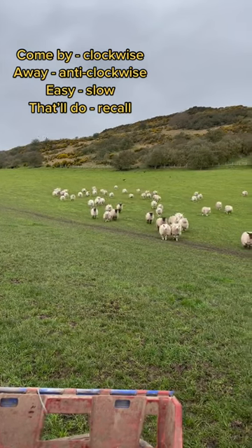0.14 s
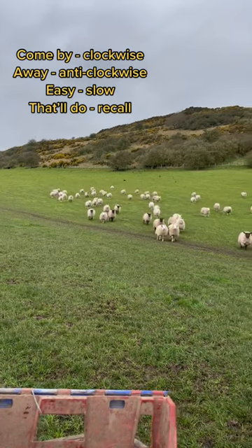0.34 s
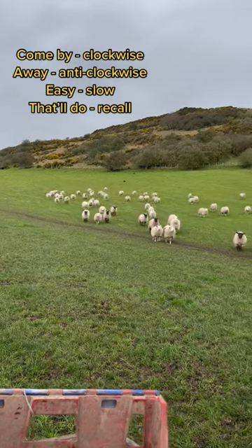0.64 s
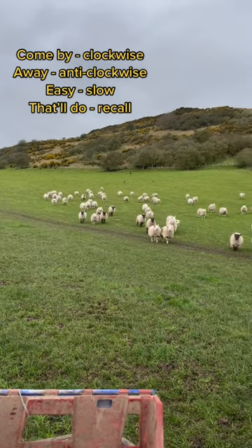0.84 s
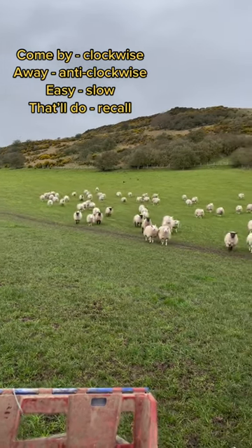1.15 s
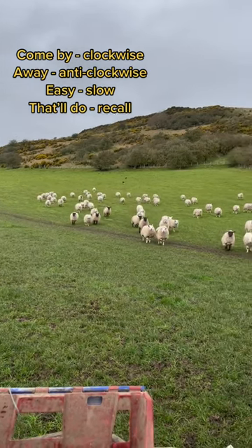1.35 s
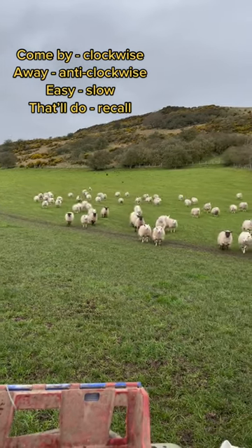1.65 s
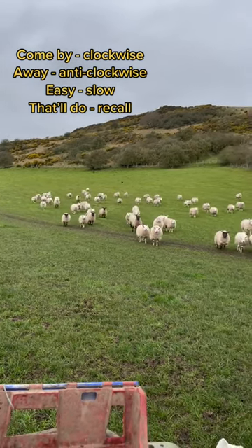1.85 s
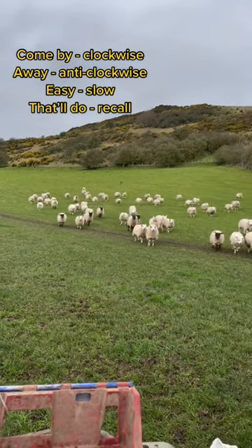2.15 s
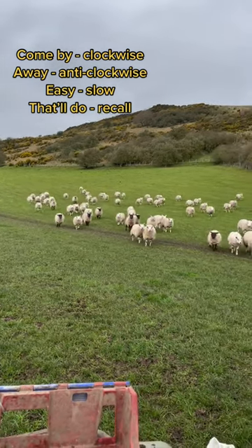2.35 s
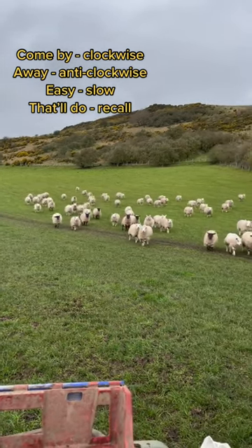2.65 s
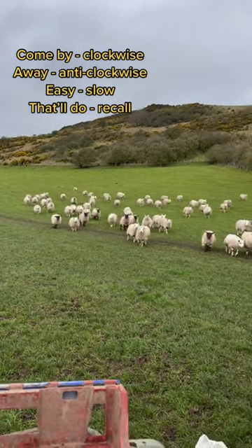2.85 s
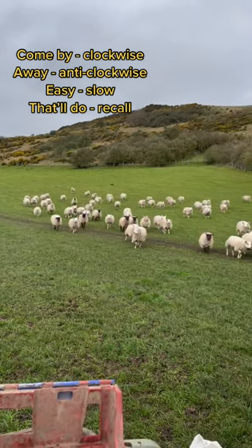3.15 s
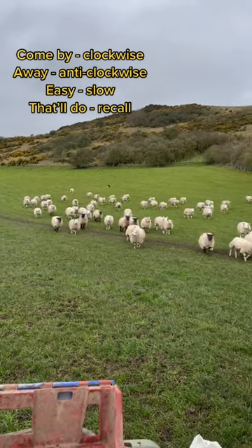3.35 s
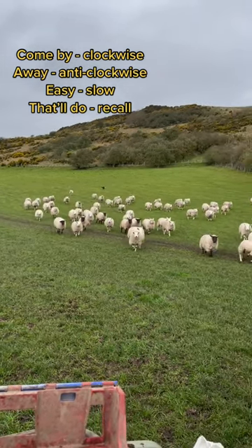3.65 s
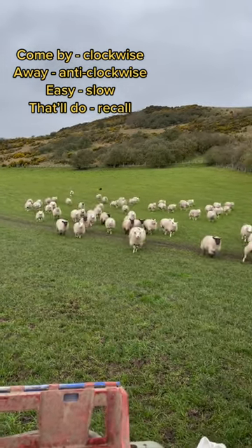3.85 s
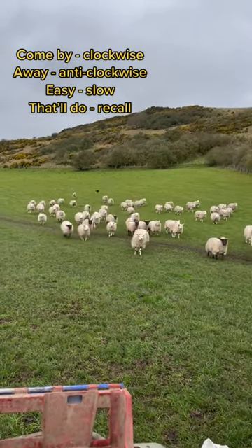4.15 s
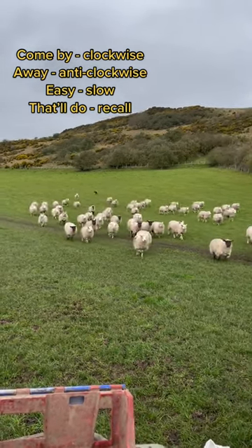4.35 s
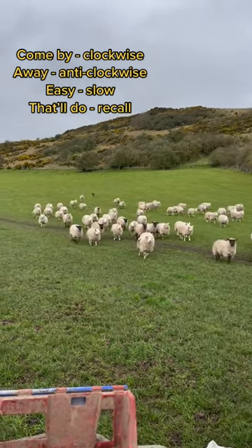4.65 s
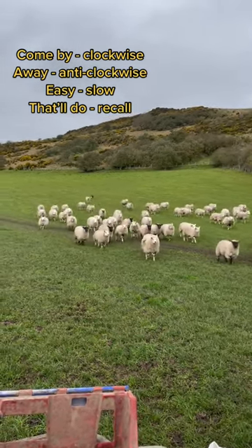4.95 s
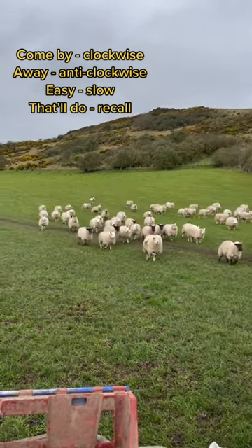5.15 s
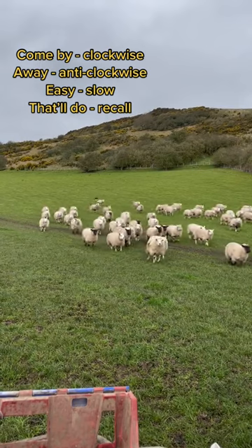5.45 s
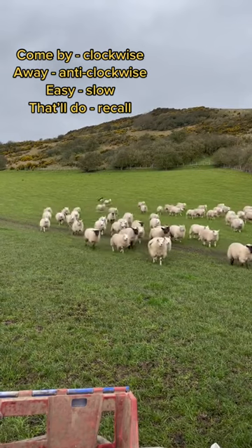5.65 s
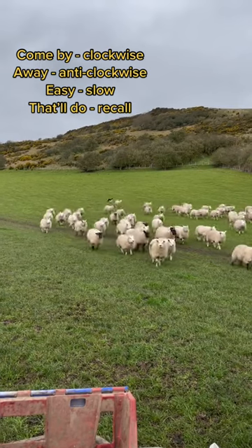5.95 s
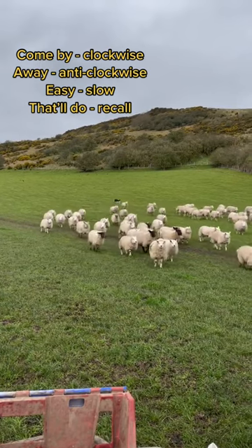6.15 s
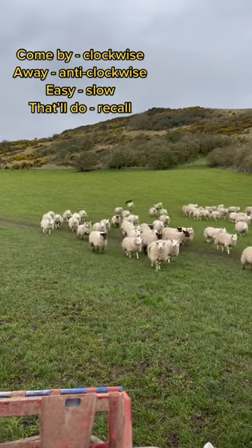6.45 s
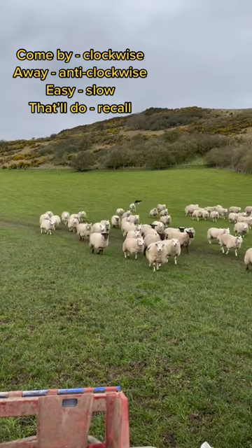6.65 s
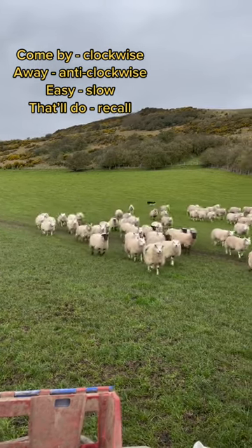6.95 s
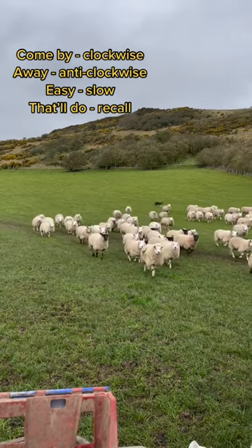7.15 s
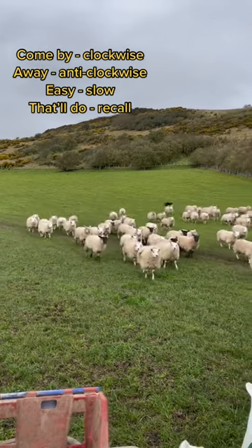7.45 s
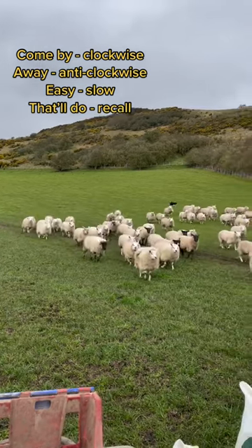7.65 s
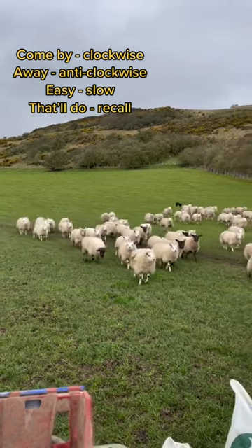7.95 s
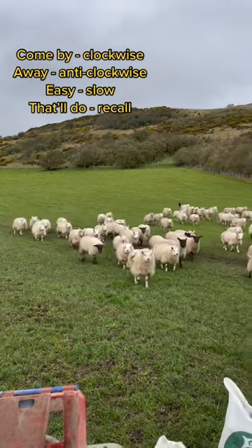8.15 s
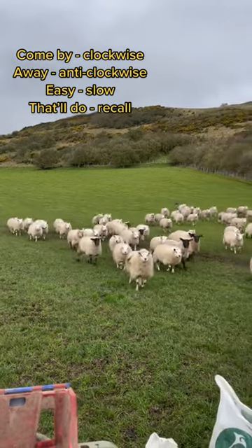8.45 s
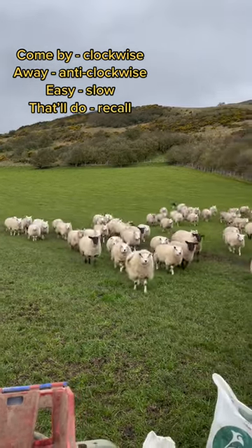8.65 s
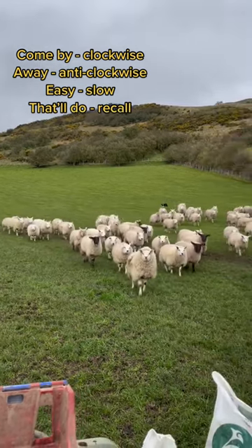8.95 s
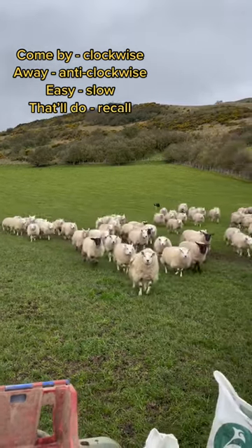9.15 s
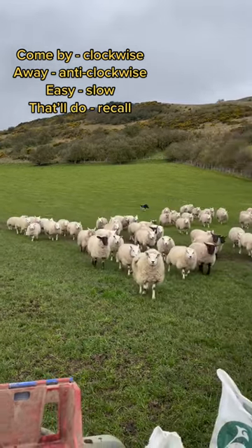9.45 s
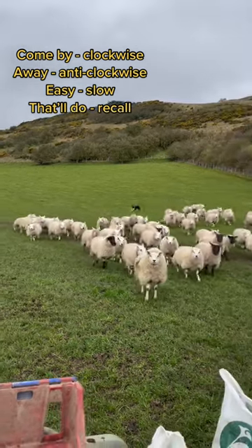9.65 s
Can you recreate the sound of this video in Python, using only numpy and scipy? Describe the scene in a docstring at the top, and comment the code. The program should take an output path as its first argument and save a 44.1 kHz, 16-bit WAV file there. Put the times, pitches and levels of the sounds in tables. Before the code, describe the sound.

A flock of sheep bleats in an open field over a soft low rumble, airy hush and faint wavering hum. A strong, long, trembling bleat begins at once and lasts to about 1.2 s, with a dull knock at 0.4. A harsh call overlaps at 0.8, a short scratchy one follows at 1.4 among tiny chirps, then distant and low voices around 1.8-2.5. A stuttering, strongly quavering bleat runs 2.7-3.7 with a thinner one behind it and a knock at 3.0. Quieter quavering and gravelly calls fill 3.9-4.9. After a lull, a swelling bleat starts at 5.4, joined by a bright loud one at 5.8-6.4. A smoother, higher call spans 6.7-7.6, with a brief pressed one and soft thump near its start. Quiet follows until a very close, loud, nasal baa at 8.4-9.0, then light bird twitters to 9.5. Short hillside reflections trail the calls.

```python
"""Flock in a field

Sheep bleat one after another, most with a quavering voice: a source of glottal pulses and breath noise excites
a filter, the changing resonances of the throat. Small birds chirp as gliding sinusoids, and a few knocks,
scuffs and ticks are enveloped bursts of filtered noise. Nearby reflections and a faint echo from a hill follow
these. Shaped noise makes a low rumble and the open air; two wavering sinusoids make a faint hum."""
import sys
import numpy as np
from scipy import signal
from scipy.fft import rfft, irfft
from scipy.io import wavfile
from scipy.ndimage import uniform_filter1d, map_coordinates

SR = 44100
rng = np.random.default_rng(int(sys.argv[2]) if len(sys.argv) > 2 else 0)


def master_out(mix):
    """Clip the mix to full scale and print it as 16-bit PCM to the path in sys.argv[1]."""
    frames = np.transpose(np.atleast_2d(mix))
    ceiling = np.clip(frames, -1, 1)
    pcm = np.round(ceiling * 32767).astype(np.int16)
    wavfile.write(sys.argv[1], SR, pcm)


N = 433062
TIME = np.arange(N) / SR


def amp(db):
    """Level definition: decibels to an amplitude ratio."""
    return 10 ** (np.asarray(db) / 20)


def unit(x):
    """Mean-square normalisation: scales to rms 1."""
    return x / np.sqrt(np.mean(x ** 2) + 1e-20)


def read(points, hz):
    """Logarithmic frequency scale: interpolates a spectrum along it."""
    f, value = np.transpose(points)
    return np.interp(np.log(hz + 1), np.log(f + 1), value)


def add(mix, s, sound):
    """Superposition: adds a sound to the mix from time s."""
    part = mix[..., max(round(s * SR), 0):][..., :sound.shape[-1]]
    part += sound[..., :part.shape[-1]]


def wander(hz):
    """Low-passed random fluctuation of rms 1, moving up to about hz times a second."""
    f = np.fft.rfftfreq(N, 1 / SR)
    return unit(irfft(rfft(rng.standard_normal(N)) / (1 + (f / hz) ** 4), N))


def colour(x, points, size=2048):
    """Minimum-phase filtering: the response is causal, so each pulse rings after it strikes."""
    log_gain = np.log(amp(read(points, abs(np.fft.fftfreq(size, 1 / SR)))))
    # the Hilbert transform of the log gain gives the phase
    taps = np.fft.ifft(np.exp(np.conj(signal.hilbert(log_gain)))).real
    return signal.oaconvolve(x, taps[:size // 2])[:len(x)]


def flock():
    """Superposition of unsteady voices that all draw on one shared set of random courses: as heard directly,
    and as they carry to the hill."""
    # Bleats: (name, opening pop [dB], roughness at start [0-1], at middle [0-1], at end [0-1],
    # share of the sideways colour, share by which a deep catch lowers the pitch, lag of that sag [s],
    # strength of the scattered sound, level sent to the hill [dB])
    calls = [("long", 6, .24, .054, .19, .17, .15, .003, 1, 0),
             ("harsh", 0, .2, .09, .2, .3, .24, 0, .9, -3),
             ("scratchy", 0, .39, .07, .3, .2, .1, .0033, .55, -2),
             ("far", 6.6, .43, .28, .56, .15, .1, .006, .94, 0),
             ("low", 0, .02, .03, .12, .17, 0, 0, 1., 0),
             ("stuttering", 0, .21, .168, .2, .058, .115, .016, .83, -2),
             ("thin", 0, .2, .15, .35, .1, .15, .0105, 1, 0),
             ("quavering", 2.6, .45, .26, .36, .18, .1, .008, .75, -6),
             ("gravelly", 0, .16, .1, .16, .18, .05, .005, .5, -3),
             ("swelling", 5, .2, .043, .15, .15, .18, .005, .96, 0),
             ("bright", 0, .22, .2, .24, .069, .13, .001, .8, -1),
             ("smooth", 0, .0091, .023, .02, .058, 0, 0, 1, 0),
             ("pressed", 0, .326, .226, .58, .14, .08, .003, .58, 0),
             ("near", 0, .17, .14, .26, .2, .19, 0, .52, -7)]
    # random courses for pitch flutter, level tremor, resonance drift and breath noise
    chance = np.array([wander(87.6), wander(150), wander(14), rng.standard_normal(N)])
    direct, carried = np.zeros((2, 2, N))
    for *call, echo_db in calls:
        start, sound = bleat(chance, *call)
        add(direct, start, sound)
        add(carried, start, amp(echo_db) * sound)
    return direct, carried


def bleat(chance, name, pop_db, rough_start, rough_middle, rough_end, side, sag_share, lag_s, scattered,
          harmonics=54):
    """Source-filter principle: uneven vocal-fold pulses and puffs of air ring in a throat that changes shape."""
    # Course of each bleat: (time [s], effort level [dB], pitch before sags and flutter [Hz])
    course = dict( long=[(.041, -44, 146), (.07, -35.5, 148.6), (.12, -38, 159.7), (.155, -33, 176.9),
              (.31, -33, 184.1), (.39, -34, 185.3), (.54, -39.5, 191.4), (.62, -37.5, 187.4),
              (.66, -42, 198.9), (.72, -44.5, 198.2), (.8, -41.5, 205.6), (.88, -45.5, 200.3),
              (.925, -42, 181.4), (1., -48, 181.6), (1.2, -42, 179), (1.255, -40.5, 167.9)],
              harsh=[(.785, -50.5, 173.5), (.805, -36.5, 175.6), (.865, -32.5, 188.9), (.9, -34.5, 185.4),
              (.95, -32.5, 180.8), (1.01, -34, 180.7), (1.07, -38, 171.5), (1.165, -37.5, 171.2),
              (1.185, -40, 150)], scratchy=[(1.345, -45, 161.6), (1.4, -40.5, 167.7), (1.48, -41, 173),
              (1.515, -41, 181), (1.545, -38.5, 193), (1.6, -42.5, 187), (1.68, -45, 170.6),
              (1.73, -53.5, 177.2), (1.77, -50.5, 160)], far=[(1.803, -47.5, 192), (1.9, -47, 201.5),
              (1.98, -43.5, 213.1), (2.06, -47.5, 212.7), (2.15, -49.5, 208.5), (2.32, -47, 198.4),
              (2.4, -43.5, 196), (2.49, -45, 188)], low=[(2.03, -51.5, 147.1), (2.22, -50.5, 148.9),
              (2.38, -51.5, 145.3), (2.5, -53, 135.7)], stuttering=[(2.712, -50, 174.6), (2.732, -47, 185),
              (2.83, -40, 200), (2.91, -38, 205.8), (3.08, -39, 211.1), (3.24, -41, 207),
              (3.33, -39, 201.9), (3.42, -39.5, 200.4), (3.51, -39.5, 200.6), (3.6, -42.5, 191.6),
              (3.71, -47.5, 181.5)], thin=[(2.83, -51.5, 213), (2.94, -48, 213.6), (3.11, -50, 210),
              (3.2, -45.5, 202.7), (3.29, -50, 202.6)], quavering=[(3.886, -55, 95.5), (4., -49, 140.7),
              (4.09, -48.5, 140.6), (4.15, -40.5, 151.6), (4.22, -50, 148), (4.38, -52, 146),
              (4.46, -43.5, 146), (4.61, -44, 158.4), (4.71, -43, 157.1), (4.79, -45, 155.1),
              (4.895, -46, 153.7)], gravelly=[(4.145, -55, 141.2), (4.168, -46, 139.7), (4.22, -48, 133.6),
              (4.3, -42, 137.3), (4.37, -47.5, 133), (4.47, -52, 130), (4.53, -48.5, 129.5),
              (4.62, -49.5, 127), (4.715, -51, 120)], swelling=[(5.432, -61, 130.8), (5.457, -37, 135),
              (5.475, -55, 146.6), (5.5, -47, 152.3), (5.555, -34, 169.9), (5.71, -33.5, 178.4),
              (5.79, -34.5, 183), (5.9, -36, 184.6), (6., -41, 190.3), (6.09, -43.5, 197.8),
              (6.2, -43, 180.8), (6.4, -42, 174.8), (6.54, -42.5, 178.3), (6.625, -41.5, 170.8),
              (6.665, -53.5, 159.7), (6.73, -52, 165.5)], bright=[(5.825, -41.5, 182.3), (5.86, -39, 189),
              (5.93, -37, 192.6), (6., -32.5, 201.5), (6.07, -31, 195.8), (6.17, -32, 189.4),
              (6.25, -31, 195), (6.305, -30, 194), (6.345, -35.5, 182.5), (6.39, -38.5, 162.8)],
              smooth=[(6.72, -49.5, 204.8), (6.77, -39.5, 210.5), (6.84, -35.5, 219.6), (6.93, -32, 227.2),
              (7.02, -34, 221.4), (7.14, -36.5, 216.1), (7.23, -38, 212.1), (7.29, -40, 213),
              (7.355, -32.5, 220.9), (7.41, -39, 215.6), (7.47, -38.5, 205.1), (7.54, -41, 191.8),
              (7.57, -50.5, 178)], pressed=[(6.92, -48, 166), (6.98, -43, 174.2), (7.07, -30.5, 180.2),
              (7.12, -40, 178.1), (7.2, -42, 172), (7.26, -38.5, 169.6), (7.28, -42, 160.3)],
              near=[(8.305, -64, 138.2), (8.392, -50, 161.9), (8.401, -39, 167), (8.432, -34.5, 168),
              (8.458, -25, 182.9), (8.535, -24.5, 183.9), (8.63, -25.5, 186.4), (8.7, -26.5, 183.2),
              (8.78, -28.5, 171.6), (8.87, -34.5, 149), (8.91, -36, 150.1), (8.968, -34, 152.4)])
    # Throat shapes that each bleat passes through: (time [s], [(frequency [Hz], relative level [dB])])
    throat_shapes = dict( long=[(.25, [(170, -10), (410, -38), (700, 2), (1020, -12), (1340, -10.5),
                     (1630, 5.5), (2220, -1.5), (2390, -10.5), (4080, -24.5), (5300, -17.5), (5770, -36),
                     (7730, -37), (9300, -49)]), (.5, [(170, -6.5), (480, -16), (750, 8), (1230, -16.5),
                     (1630, 8), (1900, -6), (2150, 2), (2450, -21), (3260, -13.5), (3900, -21), (4650, -18),
                     (7580, -25.5), (9300, -54)]), (.75, [(170, -5.5), (480, -9), (780, 2), (1230, -6.5),
                     (1590, 6.5), (1850, -7), (2150, -2.5), (2450, -15.5), (3260, -16), (4650, -20.5),
                     (9300, -54)])], harsh=[(.85, [(170, -19), (410, -23), (750, -9), (1230, -24),
                     (1800, 2.5), (2170, -12), (2700, 3.5), (3300, -5), (3730, -10), (4760, -42),
                     (6410, -51), (9300, -66)]), (.96, [(170, -19), (460, -18), (720, -2.5), (1160, -18),
                     (1800, 1), (2000, -7.5), (2170, -8), (2340, -10), (2520, -2.5), (2700, -7), (2880, 1),
                     (3060, -5), (3250, 2.5), (3650, -4.5), (4170, -26), (5530, -19), (6410, -42),
                     (7120, -28), (9300, -46)])], scratchy=[(1.42, [(170, -18), (750, -11), (1050, -34),
                     (1340, -26), (1780, 8.5), (2170, -6.5), (2600, 2), (3100, -5), (3820, -12),
                     (4650, -11), (6690, -16), (7120, -17), (7730, -20), (9300, -57)]), (1.57, [(170, -23),
                     (750, -12), (1050, -27), (1340, -17), (1860, 2), (2170, -9.5), (2450, 1), (3100, -10),
                     (3820, -15), (4650, -14.5), (6690, -25.5), (7120, -19), (7730, -23), (9300, -61)])],
                     far=[(2., [(170, 1), (370, -9), (840, 2), (1300, -7.5), (1540, 0), (1860, 14),
                     (2510, -7), (2760, -21), (3040, -8), (3570, -30), (4550, -60), (9300, -97)])],
                     low=[(2.3, [(170, -16), (500, -9), (730, -2), (1150, -20), (1480, -7.5), (1620, 6.5),
                     (1900, -31), (2290, -6), (3000, -24), (9000, -68)])], stuttering=[(2.85, [(170, -5.5),
                     (480, -19), (770, 3.5), (1120, -22), (1400, -13), (1680, 8), (2060, -14), (2500, -12),
                     (3000, -14), (4170, -11), (4860, -28), (9300, -69)]), (3.3, [(170, -8.5), (480, -20),
                     (770, 6), (1120, -22), (1400, -19), (1700, 2.5), (2060, -15), (2480, 5), (3000, -19),
                     (4170, -23), (4860, -26), (9300, -54)]), (3.55, [(170, -14), (480, -37.5), (740, 3),
                     (1120, -36.5), (1400, -15), (1700, 6.5), (2060, -17), (2480, -0.5), (3000, -18),
                     (4170, -14.5), (4860, -25), (9300, -61)])], thin=[(3., [(170, -23), (800, -6),
                     (1200, -17), (1750, -5), (2250, -6), (2500, 4), (2820, -3), (3300, -14), (5200, -13.5),
                     (7500, -34), (9300, -49)])], quavering=[(4.1, [(170, -6), (410, -6.5), (750, -6),
                     (1150, -27), (1800, 6), (2110, -4), (2450, 1), (2900, -16), (3330, -11.5), (4970, -13),
                     (6020, -29), (9300, -49)]), (4.7, [(170, -28), (400, -25), (660, 11.5), (1150, -36),
                     (1750, 0.5), (2050, -20), (2420, 9.5), (2750, -8), (3100, -13), (4400, -15),
                     (6800, -36), (9300, -45)])], gravelly=[(4.3, [(170, -20), (410, -13), (750, -10),
                     (1050, -14), (1340, -16), (1760, 3.5), (2110, -7), (2450, 0.5), (2850, -1), (3330, -7),
                     (4970, -8.5), (6020, -16.5), (6830, -40), (8060, -16), (9300, -40)]),
                     (4.62, [(170, -20), (660, -4), (1150, -23), (1720, 1.5), (2100, -10), (2900, -2),
                     (3500, -3.5), (4900, -8), (6000, -16.5), (9300, -23)])], swelling=[(5.55, [(170, -18),
                     (450, -25.5), (720, -8.5), (1100, -18.5), (1450, -14.5), (1720, 4.5), (2000, -19),
                     (2200, -11.5), (3000, -27.5), (3700, -18.5), (4400, -31), (5300, -20.5), (6300, -46),
                     (9300, -54)]), (5.78, [(170, -1.5), (430, -26), (720, 6), (1120, -14.5), (1400, 0),
                     (1670, 7.5), (1960, -20), (2140, 5), (2500, -17), (3040, -19), (3550, -10),
                     (4080, -26), (5410, -14.5), (6550, -51), (6970, -31), (9300, -56)]),
                     (6.05, [(170, -10), (460, -11.5), (760, 8.5), (960, -0.5), (1200, -4), (1530, 6.5),
                     (1960, -7), (2200, -5), (3040, -31), (3600, -21), (4300, -30), (5400, -17),
                     (9300, -52)]), (6.48, [(170, -9), (460, -12), (700, -2.5), (1160, -14), (1540, 1.5),
                     (1910, -16.5), (2150, -1.5), (2500, -14), (3600, -15), (4550, -30.5), (5300, -22.5),
                     (7120, -37), (9300, -43)])], bright=[(5.96, [(170, -6), (500, -15), (780, -9),
                     (1230, -17.5), (1750, -1), (2010, -8), (2430, 6.5), (2900, -11), (3600, -33),
                     (4300, -41), (5100, -15), (5750, -3), (6300, -43), (8060, -26), (9300, -52)]),
                     (6.08, [(170, -17.5), (500, -13.5), (780, -7), (1230, -19), (1750, -3), (2010, -12),
                     (2480, 3.5), (2900, -11.5), (3600, -25), (4300, -30), (5650, -31), (6500, -43),
                     (8200, -31), (9300, -54)]), (6.26, [(170, -0.5), (460, -23), (750, -12), (1190, -18),
                     (1720, 2), (2000, -10), (2500, 10), (2950, -18.5), (3600, -14), (4200, -23.5),
                     (5770, -21), (6970, -34), (8300, -25), (9300, -42)]), (6.37, [(170, -12), (460, -8),
                     (750, -0.5), (1190, -13.5), (1720, 0), (2000, -7), (2600, 4), (3050, 0), (3600, -24),
                     (4200, -27), (5900, -15.5), (6970, -32), (8500, -18), (9300, -42)])],
                     smooth=[(6.82, [(170, 6), (430, -41), (660, -3.5), (900, -35), (1190, -19), (1600, 1),
                     (1960, -7), (2230, -1), (2500, -6), (2750, -9), (3410, -28), (4170, -22.5),
                     (5500, -28), (9300, -43)]), (7., [(170, -2.5), (430, -18.5), (680, -2.5), (900, -22),
                     (1300, -8), (1620, 5), (1960, -19), (2230, 10.5), (2500, -2), (2850, -1), (3400, -33),
                     (4000, -22), (5700, -31), (9300, -49)]), (7.4, [(170, -6.5), (460, -24.5), (640, -13),
                     (890, -17.5), (1300, -8), (1720, 1), (1930, -12.5), (2200, 2), (2420, 3), (2900, -10),
                     (3200, -24), (4550, -29), (5530, -33), (9300, -50)])], pressed=[(7.07, [(170, -15),
                     (480, -13), (720, -9.5), (1150, -23), (1750, 0), (2050, -9), (2500, 4), (2950, -3.5),
                     (3400, -10.5), (4000, -19), (4700, -18.5), (5400, -9.5), (5950, -13), (6690, -36),
                     (7890, -26), (9300, -37.5)])], near=[(8.41, [(170, -13), (500, -12), (700, -10),
                     (1100, -29), (1800, -6), (2150, -11), (2600, 1), (3300, -20), (4200, -31), (5400, -36),
                     (9300, -42)]), (8.46, [(170, -10), (360, -10), (520, -7), (700, 5), (1000, -36),
                     (1810, 6), (2170, -7), (2700, 11.5), (3250, -9), (3900, -25), (4650, -13), (5650, -14),
                     (6970, -37), (8230, -26), (9300, -58)]), (8.55, [(170, -20), (360, -3.5), (520, -7),
                     (720, -2), (1000, -27), (1400, -19), (1810, 9), (2170, -9), (2760, 6), (3250, -3.5),
                     (3900, -20), (4650, -8), (5800, -11.5), (6970, -31), (8230, -23), (9300, -37)]),
                     (8.9, [(170, -7.5), (350, -5), (670, 1), (810, -15), (1020, -25.5), (1760, 6.5),
                     (2110, -6), (2700, 4.5), (3330, -6), (3650, -3), (3990, -9.5), (5650, -8),
                     (6690, -28.5), (7730, -16), (9300, -36)])])
    # Catches in the voice: (time [s], dip [dB], half-width [s])
    voice_catches = dict( long=[(.055, 8.5, 0.00651), (.097, 22, 0.021), (.18, 15.5, 0.016),
                     (.26, 10.5, .015), (.335, 4.5, 0.012), (.565, 2.2, 0.018), (.96, 1.7, 0.011),
                     (1.09, 1.5, 0.016), (1.16, 2.5, .014)], harsh=[(.823, 3, 0.015), (.89, 5, .012),
                     (.955, 3.5, 0.01), (1.045, 6, .019), (1.122, 7, .021)], scratchy=[(1.361, 8, 0.0052),
                     (1.383, 10, 0.0084), (1.408, 8.5, 0.0082), (1.433, 5.5, 0.0062), (1.458, 6.2, 0.0078),
                     (1.497, 12, 0.011), (1.63, 4.5, 0.0078), (1.68, 6, 0.0079)], far=[(1.855, 28, 0.02),
                     (1.937, 11, 0.018), (2.02, 5.5, 0.016), (2.11, 5, 0.017), (2.195, 8.5, 0.021),
                     (2.28, 14.5, .022), (2.365, 14, 0.022), (2.447, 23, 0.028)],
                     stuttering=[(2.78, 18.5, 0.027), (2.868, 19.5, 0.024), (2.955, 15, 0.024),
                     (3.038, 14.2, 0.021), (3.12, 14.5, 0.02), (3.2, 15, 0.026), (3.285, 23.6, .025),
                     (3.373, 16.5, .027), (3.465, 20.5, 0.03), (3.557, 25, .028), (3.65, 16.5, 0.027)],
                     thin=[(2.895, 10, 0.019), (2.985, 11.5, 0.029), (3.07, 10.5, 0.018), (3.152, 9.5, .02),
                     (3.235, 11.5, 0.018)], quavering=[(3.905, 8.5, 0.0088), (3.948, 11, 0.017),
                     (4.036, 13, 0.016), (4.113, 23, 0.016), (4.19, 13, 0.016), (4.415, 9, 0.015),
                     (4.498, 12.5, 0.012), (4.573, 19, .019), (4.66, 14, .02), (4.747, 37, 0.021),
                     (4.842, 32, 0.027)], gravelly=[(4.187, 10.5, 0.011), (4.255, 4, 0.0065),
                     (4.347, 4, .011), (4.42, 3, 0.011), (4.5, 11, 0.0121), (4.585, 7, .012)],
                     swelling=[(5.446, 24, 0.0073), (5.516, 14.5, .011), (5.593, 14.5, .017),
                     (5.673, 11, 0.014), (5.745, 4.5, 0.013), (5.815, 3, 0.01223), (6.435, 3.5, 0.013),
                     (6.575, 6.5, 0.024)], bright=[(5.888, 14.5, 0.016), (5.96, 13.5, 0.0092),
                     (6.031, 10.5, .013), (6.107, 6.5, 0.011), (6.21, 5.5, .013), (6.282, 4, 0.0094)],
                     near=[(8.492, 4, 0.019), (8.568, 3, 0.0092), (8.61, 1.7, 0.0073), (8.656, 5.5, 0.0099),
                     (8.732, 19, .019), (8.824, 20, 0.028), (8.907, 7.5, 0.017)])
    # Share of breath noise in the source: (frequency [Hz], level [dB])
    breath = [(200, -30), (2800, -19), (4500, -6), (9000, -4)]
    # Sideways colour at a share of 1: (frequency [Hz], left minus right level [dB])
    sideways = [(150, 3), (380, 19.5), (700, -5), (1290, -7.5), (2380, -30.5), (4400, -3), (8000, -7.5)]
    pop_s, release_s = 0.003, 0.015  # the folds burst open, and fall silent this fast
    onset_rough, settle_s = 0.28, 0.074  # extra roughness until the folds settle into their swing
    follow, sway = 0.091, 0.012  # share of each pitch sag that the resonances follow, and rms share they drift

    s, *columns = np.transpose(course[name])
    span = slice(max(int(s[0] * SR), 0), int((s[-1] + release_s) * SR))
    t = TIME[span]
    flutter, tremor, drift, noise = chance[:, span]
    age = t - t[0]
    effort_db, hz = (np.interp(t, s, column) for column in columns)
    effort_db = effort_db + pop_db * np.exp(-(age / pop_s) ** 2)
    release = np.clip(1 - (t - s[-1]) / release_s, 0, 1) ** 2

    rough = np.interp(age / age[-1], [0, .5, 1], [rough_start, rough_middle, rough_end])
    rough = np.clip(rough + onset_rough * np.exp(-age / settle_s), 0, 1)
    dip_db, sag = 0, 1
    if name in voice_catches:
        dip_db, sag = quaver(t, voice_catches[name], sag_share, lag_s)
    jitter, shimmer_db = .055 * rough ** 1.2, 4 * rough

    turns = np.cumsum(hz * sag * (1 + jitter * flutter)) / SR - .1  # fold cycles so far
    cycle = (turns + .5) % 1 - .5
    # one band-limited pulse a cycle
    folds = unit(np.sinc(2 * harmonics * cycle) * np.cos(np.pi * cycle) ** 2)
    # air noise, strongest just after each pulse
    puffs = unit(noise * (.12 + np.exp(-(turns % 1) / .3)))
    rasp = .7 * rough
    drive = ((1 - rasp) * folds + rasp * puffs) / np.hypot(1 - rasp, rasp)
    # towards the treble this drive gives way to the hiss of air, at constant summed power
    clean = [(f, 10 * np.log10(1 - amp(db) ** 2)) for f, db in breath]
    drive = (colour(drive, clean) + colour(puffs, breath)) * amp(shimmer_db * tremor)

    throat = throat_shapes[name]
    moments = [moment for moment, _ in throat]
    shares = [np.interp(t, moments, row) for row in np.eye(len(throat))]  # crossfades between shapes
    stretch = 1 + follow * (sag - 1) + sway * drift
    voice = sum(share * ring(drive, shape, stretch) for share, (_, shape) in zip(shares, throat))
    voice = scatter(voice * amp(effort_db - dip_db) * release, scattered)
    ears = [colour(voice, [(f, sign * side * db / 2) for f, db in sideways]) for sign in (1, -1)]
    return t[0], np.array(ears)


def quaver(t, catches, sag, lag_s):
    """Joint amplitude and frequency modulation: each catch dips the level and sags the pitch, which scoops back."""
    full_db, spread = 8, 1.15  # a dip this deep gives most of the sag; width of the sag against the dip's
    times, depths, half_s = np.transpose(catches)[:, :, None]
    dip_db = depths * np.exp(-abs((t - times) / half_s) ** 3)
    slack = np.tanh(depths / full_db) * np.exp(-((t - times - lag_s) / (spread * half_s)) ** 2)
    return dip_db.sum(0), 1 - sag * slack.sum(0)


def ring(drive, shape, stretch):
    """Time-frequency scaling: filtering on a warped clock shifts all the resonances by the factor stretch."""
    clock = np.cumsum(stretch) - stretch[0]
    warped_places = np.interp(np.arange(clock[-1]), clock, np.arange(len(drive)))
    warped = map_coordinates(drive, [warped_places], mode="nearest")
    rung = colour(warped, closed(shape))
    return unit(map_coordinates(rung, [clock], mode="nearest"))


def closed(shape, low_db=-34, high_db=-30):
    """Band-limited transmission: a throat passes little below its fundamental or in the top treble."""
    return [(75, shape[0][1] + low_db), *shape, (10800, shape[-1][1] + high_db), (14000, -100)]


def scatter(x, amount, size=1024):
    """All-pass dispersion: grass and fleeces smear each pulse over milliseconds and leave its colour alone."""
    decay_s = 0.0048
    paths = rng.standard_normal(size) * np.exp(-np.arange(size) / SR / decay_s)
    phase = np.angle(1 + amount * rfft(paths / np.linalg.norm(paths)))
    taps = np.roll(irfft(np.exp(1j * phase)), size // 2)
    return signal.oaconvolve(x, taps, "same")


def knocks(grain_db=3, skirt_db=-42, top_hz=10500):
    """Damped noise bursts: knocks, scuffs and brief high ticks rise and decay exponentially, gritty and with no
    ring."""
    # Knocks, scuffs and a few sharp high ticks: (time of peak [s], level at peak [dB], rise [s], decay [s],
    # centre frequency [Hz],
    hits = [(0.369, -29.5, 0.018, 0.0075, 1200, 1.32), (0.368, -35.5, .012, 0.015, 290, 1),
            (1.041, -49, 0.034, 0.028, 255, 0.74), (2.68, -49.5, 0.0032, 0.016, 3920, 0.8),
            (3.004, -29.5, 0.0015, 0.007, 1100, 0.39), (3.009, -45, 0.0055, 0.049, 2830, 1.03),
            (3.041, -37.5, 0.02, 0.018, 595, 1.15), (3.3, -46, 0.059, 0.039, 160.4, 0.58),
            (3.716, -45, 0.00089, 0.0038, 4310, 0.17), (3.89, -49.5, 0.0019, 0.013, 3200, 0.13),
            (5.01, -53, 0.0041, 0.025, 3200, 1.16), (6.86, -36, 0.0075, 0.028, 450, 1.45)]
    out, t = np.zeros(N), np.arange(SR // 2) / SR
    hz, lead = np.fft.rfftfreq(len(t), 1 / SR), t[len(t) // 4]  # lead: time of the peak within the burst
    for s, db, rise_s, decay_s, centre_hz, spread in hits:
        grain = unit(uniform_filter1d(rng.standard_normal(len(t)), size=60))
        grit = rng.standard_normal(len(t)) * amp(grain_db * grain)
        # a bell on the octave scale over a faint broadband skirt
        shape = np.exp(-.5 * (np.log2((hz + 1) / centre_hz) / spread) ** 2) + amp(skirt_db)
        shape = shape / (1 + (hz / top_hz) ** 6)
        burst = unit(irfft(rfft(grit) * shape, len(t)))
        envelope = np.exp(-np.maximum((lead - t) / rise_s, (t - lead) / decay_s))
        add(out, s - lead, amp(db) * burst * envelope)
    return out


def birds(warble=0.017, warble_hz=140):
    """Frequency modulation: each whistle swoops through three pitches with a slight quick warble."""
    # Bird notes: (time [s], length [s], first pitch [Hz], middle pitch [Hz], last pitch [Hz], level [dB])
    notes = [(1.308, 0.011, 3200, 4200, 5000, -52.5), (1.335, 0.0047, 3240, 4160, 5190, -40),
             (1.449, 0.0086, 2670, 3430, 4500, -44), (1.477, 0.0062, 2500, 3300, 4400, -43),
             (1.696, 0.01, 2900, 3750, 5100, -48), (3.08, 0.029, 6000, 5800, 5300, -63),
             (3.366, 0.04, 5950, 5400, 5400, -63.5), (3.444, 0.092, 5520, 4890, 5150, -61),
             (3.776, 0.055, 4700, 5420, 4700, -63), (8.803, 0.047, 4600, 3650, 4400, -45),
             (9.099, 0.033, 3340, 2800, 3040, -59.5), (9.13, 0.032, 4280, 3560, 4560, -48),
             (9.155, 0.049, 3970, 2850, 2710, -61), (9.266, 0.028, 4830, 4260, 5440, -47.5),
             (9.285, 0.043, 4420, 3660, 2850, -52), (9.325, 0.068, 3460, 3780, 3500, -61),
             (9.36, 0.083, 4600, 4200, 3680, -62), (9.493, 0.037, 4950, 4600, 4630, -63)]
    out = np.zeros(N)
    for s, length, first, middle, last, db in notes:
        u = np.linspace(0, 1, int(length * SR))
        hz = np.polyval(np.polyfit([0, .5, 1], [first, middle, last], 2), u)
        hz = hz * (1 + warble * np.sin(2 * np.pi * warble_hz * length * u))
        whistle = np.sin(2 * np.pi * np.cumsum(hz) / SR)
        add(out, s, amp(db) * unit(whistle * np.sin(np.pi * u)))
    return out


def nearby(x):
    """Early reflections: a few dull copies blur each pulse and differ between the two ears."""
    # Spectrum of the reflected sound: (frequency [Hz], level [dB])
    dull_spectrum = [(120, -36), (350, -8), (700, -3.5), (1500, -10.5), (3000, -7), (6000, -3),
                     (12000, -25)]
    # Reflections off things close by: (delay [s], level [dB], ear [0 left, 1 right])
    bounces = [(.0021, -35, 0), (.0029, -3, 1), (.0047, -9.5, 1), (.0064, -14, 0), (.0089, -8, 1),
               (0.011, -13, 0), (.0142, -20.5, 1), (.0171, -4, 0)]
    dull, out = colour(x.mean(0), dull_spectrum), np.zeros((2, N))
    for delay_s, db, ear in bounces:
        add(out[int(ear > .5)], delay_s, amp(db) * dull)
    return out


def echoes(x, points, delay_s, t60):
    """Exponential decay of sparse reflections, different at each ear, falling 60 dB in t60 seconds."""
    t = np.arange(SR) / SR
    signs = rng.choice([-1., 1.], (2, SR))
    struck = rng.random((2, SR)) < 1 / 16
    taps = signs * struck * (t > delay_s) * amp(-60 * t / t60)
    taps = np.array([colour(ear / np.linalg.norm(ear), points) for ear in taps])
    return signal.fftconvolve(x, taps, axes=1)[:, :N]


def air(size=2048):
    """Frequency-dependent coherence: a rumble alike in both ears, under the wider, even hush of the field."""
    # Air spectrum: (frequency [Hz], relative level per Hz [dB])
    spectrum = [(20, -60), (40, -0.5), (62, 6), (110, -4.5), (150, -5.5), (185, -10.5), (240, -14.5),
                (650, -15), (1000, -19.5), (1400, -27.5), (2400, -31.5), (5000, -35), (8600, -43.5),
                (10500, -73.5), (15500, -55.5)]
    # Lift of the air above the rumble: (time [s], relative level [dB])
    field_lift = [(0, 7), (1.2, 8.5), (2.6, 4.5), (3.2, 7.5), (4, 6), (5.2, 4.5), (7, 7.5), (8, 5),
                  (9.8, 7)]
    # Likeness of the two ears: (frequency [Hz], left-right correlation [0-1])
    likeness = [(100, 1), (200, 1), (400, 0.33), (1000, 0.03), (3000, 0.4), (10000, 1)]
    level_db = -49
    hop = size // 4
    t, hz = np.arange(N // hop + 5) * hop / SR, np.fft.rfftfreq(size, 1 / SR)
    a, b, c, d = rng.standard_normal((4, len(hz), len(t)))
    same = np.clip(read(likeness, hz), -1, 1)[:, None]
    left = a + 1j * b
    z = np.array([left, same * left + np.sqrt(1 - same ** 2) * (c + 1j * d)])
    upper = (hz ** 2 / (hz ** 2 + 160 ** 2))[:, None]  # spares the rumble from the lift
    z *= amp(read(spectrum, hz)[:, None] + upper * np.interp(t, *np.transpose(field_lift)))
    noise = signal.istft(z, nperseg=size, noverlap=size - hop)[1][:, :N]
    high_pass = signal.butter(3, 48, "high", fs=SR, output="sos")
    return amp(level_db) * unit(signal.sosfilt(high_pass, noise))


def hum(waver=.012, flicker_db=3, octave_db=-8):
    """Harmonic series of two: a low tone and its octave waver in pitch and flicker in level."""
    # Hum: (time [s], level before flicker [dB])
    levels = [(0.0, -66), (1.06, -61), (2.51, -69), (2.65, -56), (3.44, -61), (3.58, -51.5), (5.73, -65.5),
              (6.17, -50), (7.64, -51), (8.0, -60.5), (9.8, -52)]
    hum_hz = 93.5
    phase = 2 * np.pi * np.cumsum(hum_hz * (1 + waver * wander(7.1))) / SR
    level_db = np.interp(TIME, *np.transpose(levels)) + flicker_db * wander(2.9)
    return amp(level_db) * unit(np.sin(phase) + amp(octave_db) * np.sin(2 * phase))


def scene():
    """Superposition: voices and small sounds, thrown back by things nearby and the hill, over air and hum."""
    # Spectrum of the hill's echo: (frequency [Hz], level [dB])
    hill_spectrum = [(150, -38.5), (700, -6), (2500, -9), (8000, -6.5)]
    voices, carried = flock()
    small = knocks() + birds()
    direct = voices + small
    far = echoes(carried + amp(-0.5) * small, hill_spectrum, delay_s=0.02, t60=0.33)
    return amp(-1.02) * direct + nearby(direct) + far + air() + hum()


def record(dry):
    """Band limitation: the recorder's linear-phase low-pass removes the extreme treble."""
    edge_hz = 15750
    taps = signal.firwin(511, edge_hz, window=("kaiser", 9), fs=SR)
    return signal.oaconvolve(dry, taps[None], "same")


dry = scene()
out = record(dry)
master_out(out)
```